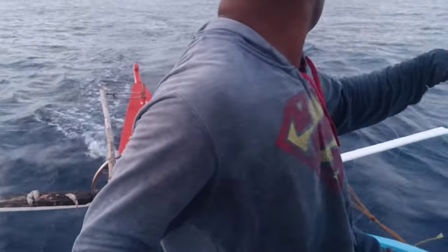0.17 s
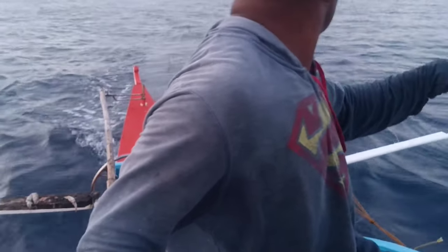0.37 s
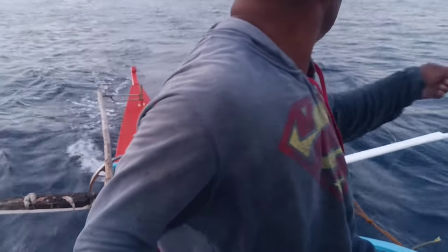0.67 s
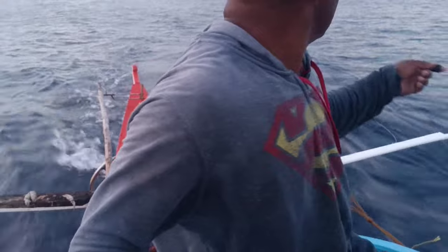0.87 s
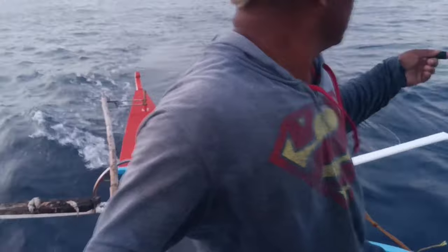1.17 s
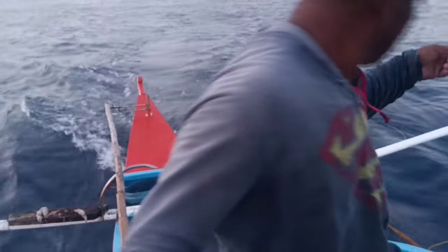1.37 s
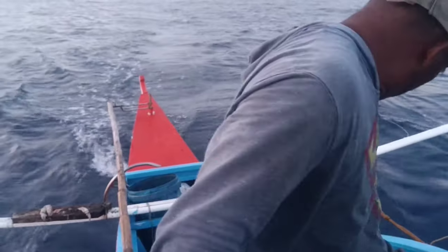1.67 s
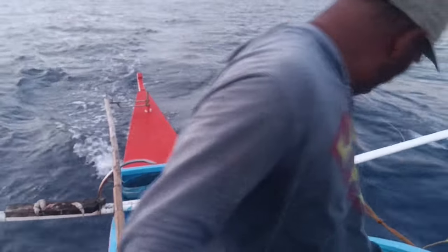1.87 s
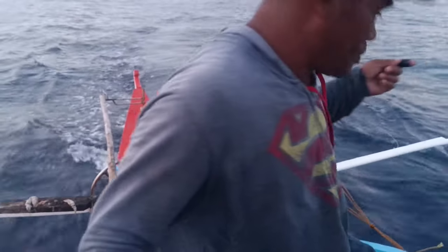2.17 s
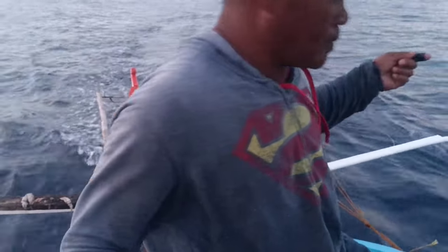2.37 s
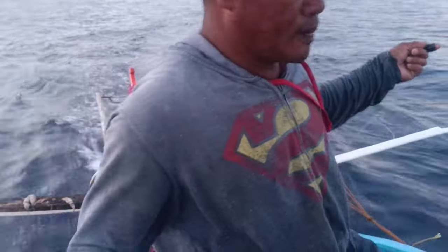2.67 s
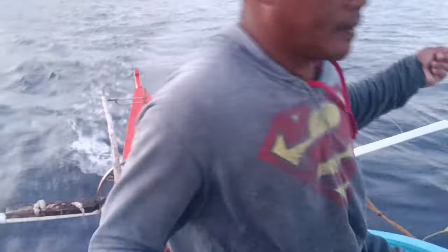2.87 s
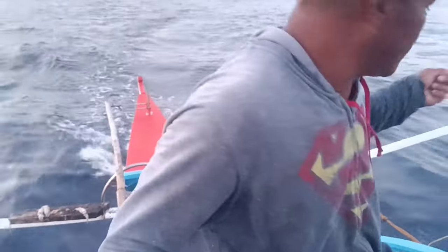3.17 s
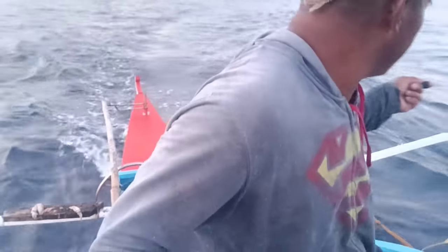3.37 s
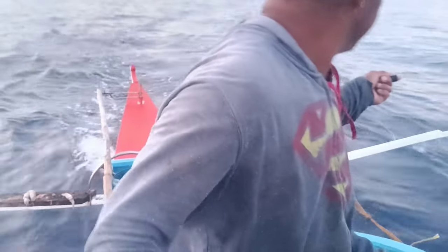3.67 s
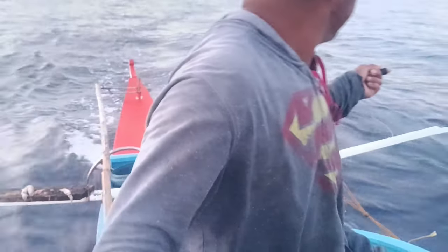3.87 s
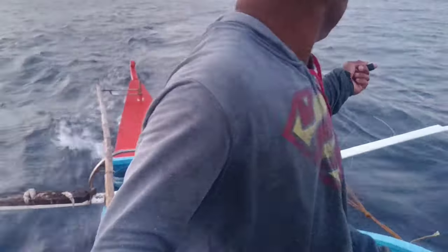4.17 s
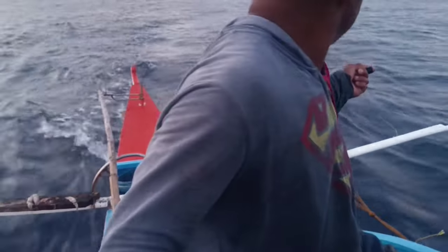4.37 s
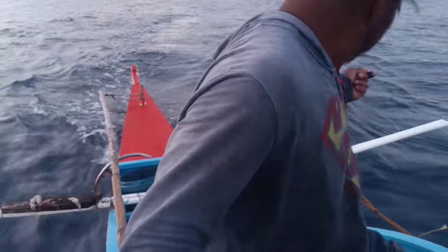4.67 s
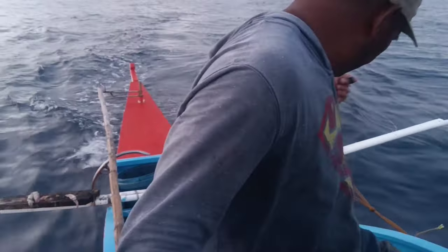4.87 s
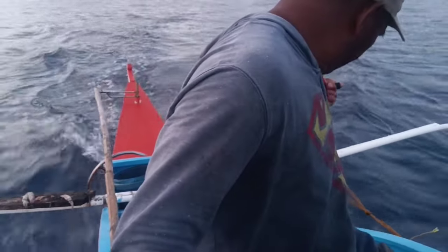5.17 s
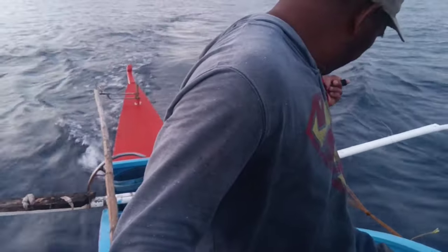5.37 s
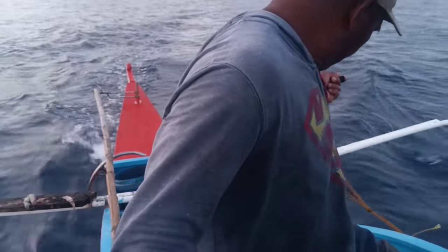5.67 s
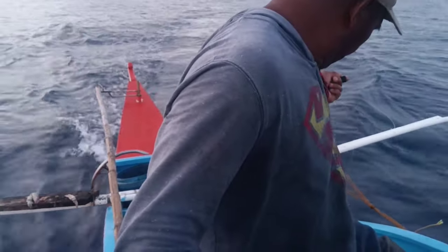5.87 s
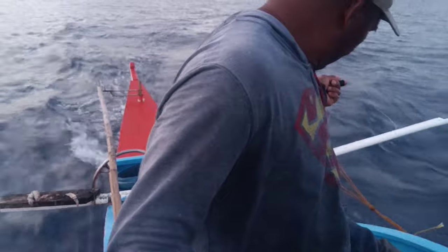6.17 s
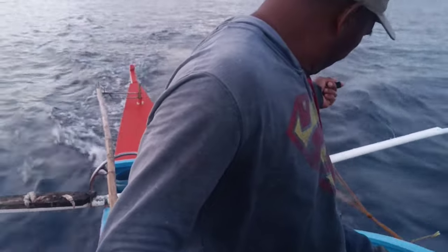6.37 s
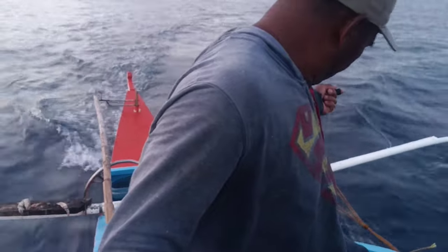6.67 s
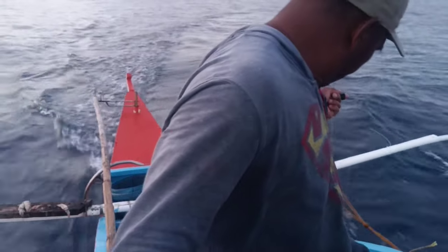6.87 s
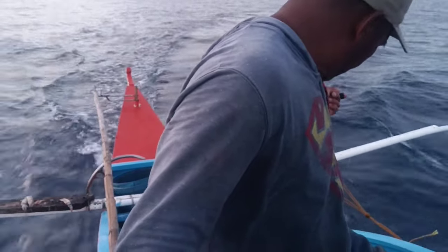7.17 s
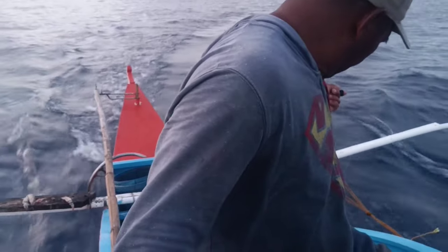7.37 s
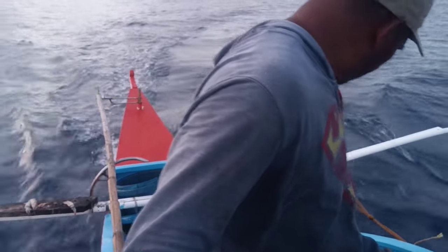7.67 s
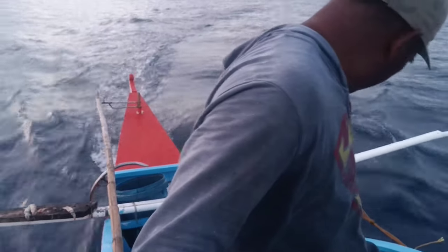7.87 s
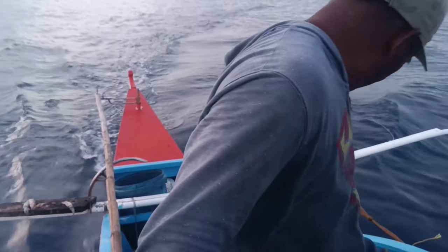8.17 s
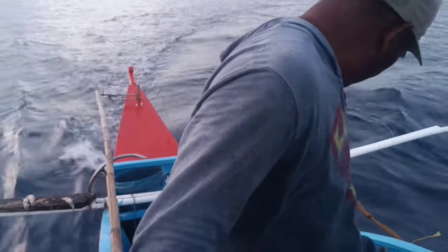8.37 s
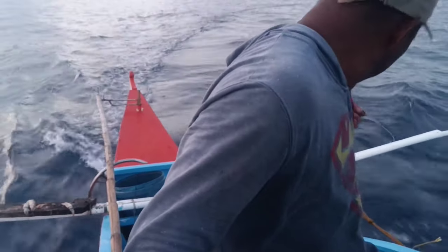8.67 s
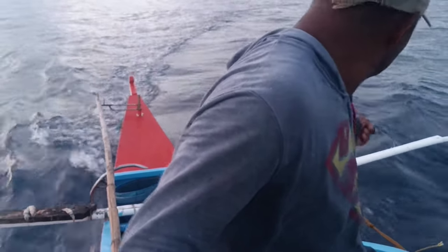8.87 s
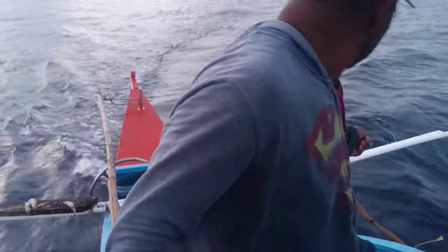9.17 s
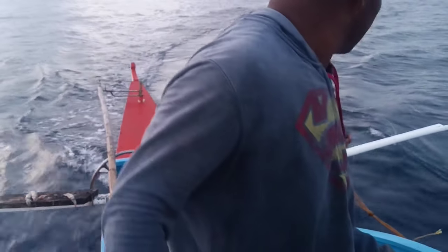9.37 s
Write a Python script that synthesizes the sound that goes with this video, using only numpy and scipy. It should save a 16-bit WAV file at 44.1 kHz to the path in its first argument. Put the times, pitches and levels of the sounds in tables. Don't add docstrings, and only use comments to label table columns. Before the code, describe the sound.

A small boat's one-cylinder engine thuds rapidly at cruising speed, then is throttled back to a slower, clattering idle amid hissing spray and light wind.

```python
import sys
import numpy as np
from scipy import signal
from scipy.fft import rfft, irfft, next_fast_len
from scipy.io import wavfile
from scipy.ndimage import uniform_filter1d, map_coordinates

SR = 44100
rng = np.random.default_rng(int(sys.argv[2]) if len(sys.argv) > 2 else 0)


def boost(x):
    u = np.asarray(x, float) / 20
    return 10 ** u


def dump(signal):
    limited = np.clip(np.atleast_2d(signal).T, -1, 1)
    pcm = np.round(limited * 32767).astype(np.int16)
    wavfile.write(sys.argv[1], SR, pcm)


N = 419832

# time in seconds, firings a second.
SPEED = [(0.0, 14.044), (1.5, 14.296), (2.1, 14.042), (3.0, 14.175), (3.6, 14.079), (4.36, 14.151),
         (4.5, 13.663), (4.65, 12.655), (5.1, 11.31), (5.8, 10.912), (6.1, 10.93), (6.4, 10.695),
         (7.3, 10.84), (7.6, 10.532), (7.9, 10.664), (8.5, 10.532), (8.8, 10.729), (9.52, 10.497)]
# time in seconds, load from 0 to 1.
THROTTLE = [
    (0, 1),
    (4.35, 0.95),
    (4.9, 0),
    (9.52, 0.14),
]
# mode in Hz, width in Hz, signed swing.
LOADED_PIPE = [(57.0, 8.0, -0.029), (109.5, 38.1, 0.499), (124.2, 15.8, -0.178), (136.2, 9.5, 0.181),
               (150.2, 15.3, -0.784), (183.3, 11.3, 0.2), (210.9, 8.0, -0.049), (251.0, 8.9, -0.117),
               (314.7, 15.1, -0.292), (327.7, 70.7, 0.656), (345.5, 16.2, -0.135), (367.9, 8.0, -0.061),
               (392.4, 24.2, -0.06), (439.2, 12.8, 0.022), (479.1, 12.8, -0.027)]
# mode in Hz, width in Hz, signed swing.
IDLE_PIPE = [(82.1, 16.1, -0.066), (95.4, 14.0, 0.203), (116.7, 17.8, 0.25), (131.0, 10.8, 0.267),
             (150.0, 33.1, -1.248), (175.4, 12.0, 0.393), (250.6, 8.0, 0.127), (265.6, 51.5, -0.361),
             (295.3, 38.1, 0.267), (320.5, 15.8, -0.164), (329.7, 11.7, 0.103), (379.3, 30.2, -0.085),
             (380.7, 11.2, 0.068), (469.3, 10.4, 0.02), (478.3, 14.6, -0.02)]
# mode in Hz, width in Hz, signed swing.
VALVE_CHEST = [
    (304, 56, 0.27),
    (383, 53, 0.24),
]
# mode in Hz, t60 in seconds, level under load in dB, level at idle in dB.
PLATES = [(863, 0.15, -2, -4.5), (1137, 0.17, -4.5, -4), (1274, 0.088, -3, -8), (1552, 0.086, 6, -17),
          (1692, 0.14, 3, -1.5), (1830, 0.13, -3, -5), (1876, 0.12, 6, -7), (1930, 0.031, -17, -14),
          (2293, 0.084, -2, 3), (2774, 0.026, 10, -9), (3313, 0.04, 4.5, -41), (3970, 0.06, -3, -30),
          (4480, 0.056, -1, -30)]
# frequency in Hz, level in dB per Hz.
RATTLE_COLOUR = [(260, -2.5), (450, -0.5), (530, -7), (858, -4), (1230, -8), (1820, -6.5), (2080, -10),
                 (4210, -27.5), (4500, -24), (5850, -36), (9900, -120)]
# frequency in Hz, level in dB per Hz.
KNOCK_COLOUR = [(1180, -48), (2000, 0), (3220, -5.5), (4240, -13.5), (4550, -6), (5900, -9.5), (7710, -10),
                (10500, -15.5), (12500, -15.5), (14900, -20), (15800, -37)]
# frequency in Hz, level in dB per Hz.
SPRAY_COLOUR = [(1470, -14), (2500, -1.5), (3350, -3.5), (4220, -16), (5660, -10), (6660, -15), (7830, -15),
                (9950, -20.5), (12200, -17), (14900, -25), (15800, -32)]
# frequency in Hz, level in dB per Hz.
RUMBLE_COLOUR = [(20, -46), (40, -12.5), (60, -3.5), (120, -11.5), (250, -2.5), (400, -11.5), (520, -21.5),
                 (700, -21), (1000, -50.5)]
# start in seconds, fizz in dB, body over the fizz in dB, length in seconds.
SPLASHES = [(1.461, -38.5, 2, 0.035), (1.49, -46, 2, .01), (1.504, -46.5, 0, 0.072), (2.5, -50, 10, 0.028),
            (2.902, -38.5, -1.5, .03), (4.612, -46, 3, 0.037), (4.642, -35, -4, .007),
            (4.684, -44, 2, 0.048), (5.704, -47, 10, 0.011), (5.762, -40, -8, .005),
            (5.865, -46, 2.5, 0.064), (6.015, -43, 2, 0.035), (6.573, -49.5, 5, 0.063),
            (6.599, -36, 8, 0.004), (6.903, -49, 7, .01), (6.948, -43, -3, 0.031), (6.983, -40, -2, .02),
            (7.558, -44, 3, .015), (8.013, -41.5, -1, 0.015), (8.263, -45, -2, 0.044)]
# start in seconds, level in dB, t60 in seconds.
DECK_KNOCKS = [
    (1.464, -18.5, 0.095),
    (2.908, -26.5, 0.18),
    (4.008, -24, 0.073),
]
# top in seconds, half length in seconds, gain of the deck hum in dB.
SWELLS = [
    (0.3, 0.17, 6.5),
    (1.3, 0.22, 6.5),
    (2.65, .25, 6),
    (5.103, 0.61, 7.5),
    (7.5, 0.25, 1.5),
    (8.495, 0.21, 6.5),
    (9.2, 0.21, 10),
]
# top in seconds, half length in seconds, level in dB.
GUSTS = [(1.585, .17, -29.5), (4.9, .25, -32), (5.91, 0.15, -29), (6.163, 0.034, -27), (6.58, 0.23, -34.5),
         (6.89, 0.18, -32), (7.2, 0.11, -32), (7.603, 0.14, -33.5), (7.92, 0.15, -31), (8.166, 0.22, -25.5),
         (8.598, 0.18, -30), (8.988, 0.22, -33), (9.482, .06, -33)]
# time in seconds, eddies a second.
EDDIES = [(1.3, 69), (1.5, 75.3), (1.8, 72), (5.2, 75.8), (5.65, 68.6), (5.8, 71), (6.7, 68.5), (7.0, 70.3),
          (7.15, 75.4), (7.78, 72.7), (7.94, 81.8), (8.02, 77), (8.18, 85), (8.36, 75.8), (8.58, 83.5),
          (8.68, 77), (9.1, 78), (9.45, 69)]
# frequency in Hz, side over middle in dB.
WIDTH = [(60, -2.5), (110, -1), (200, -6.5), (380, -9), (700, -5), (1290, -1.5), (2380, -1.5), (4400, 1),
         (8120, -0.5), (15000, 0)]
# frequency in Hz, left over right in dB.
PORTS = [(60, -0.5), (110, -0.5), (200, -1.0), (380, 2.5), (700, 0), (1290, 0.5), (2380, -0.5),
         (4400, -0.5), (8120, -4.5), (15000, 12.5)]

CRANK_START = -.691
LEAD = .25
TOP_HZ = 15850
CALM_DB = -60
# (dB under load, dB at idle)
THUD_DB, HUM_DB, RATTLE_DB = (-13.5, -14.5), (-41.5, -37.5), (-31.5, -28.5)
KNOCK_DB, SPRAY_DB = (-42.5, -45), (-47.5, -44.5)
OVERRUN, VALVE_S = 0.053, .0266
POP_S, IDLE_HZ = .036, 10.7
POP_IDLE, POP_OVERRUN = 0.11, 0.57
AHEAD, AHEAD_HZ = .5, 3000


def unit(x):
    return x / np.sqrt(np.mean(x ** 2) + 1e-20)


def along(points, hz):
    f, v = np.transpose(points)
    return np.interp(np.log(hz + 1), np.log(f + 1), v)


def coloured(points):
    return lambda hz: boost(along(points, hz))


def narrow(centre_hz, width_hz):
    return lambda hz: 1 / (1 + (2 * (hz - centre_hz) / width_hz) ** 2)


def curves(rows, t=None):
    s, *cols = np.transpose(rows)
    return [np.interp(np.arange(N) / SR if t is None else t, s, c) for c in cols]


def by_load(levels_db):
    load, = curves(THROTTLE)
    return load * levels_db[0] + (1 - load) * levels_db[1]


def bells(top_s, half_s):
    return np.exp(-((np.arange(N) / SR - top_s[:, None]) / half_s[:, None]) ** 2)


def wobble(rate):
    knots = rng.standard_normal(int(N * rate / SR) + 4)
    return map_coordinates(knots, [np.arange(N) * rate / SR])


def filtered(x, response):
    m = next_fast_len(N + 8192)
    return irfft(rfft(x, m) * response(np.fft.rfftfreq(m, 1 / SR)), m)[..., :N]


def rush(gain, patchy_db, tall=6, long=5):
    z = signal.stft(rng.standard_normal((2, N + 512)), nperseg=512)[2]
    field = uniform_filter1d(rng.standard_normal(z.shape[1:]), int(tall), 0)
    field = uniform_filter1d(field, int(long), 1)
    z = z * boost(patchy_db * unit(field))
    ahead = AHEAD / np.hypot(1, np.fft.rfftfreq(512, 1 / SR)[:, None] / AHEAD_HZ)
    z[1] = np.sqrt(1 - ahead ** 2) * z[1] - 1j * ahead * z[0]
    pair = signal.istft(z, nperseg=512)[1][:, :N]

    def spread(hz):
        side_gain = boost(along(WIDTH, hz)) / (1 + (70 / (hz + 1)) ** 2)
        return gain(hz) * np.array([np.ones_like(hz), side_gain])

    mid, side = filtered(pair, spread)
    return np.array([mid + side, mid - side]) / np.std(mid)


def laid(times, sounds):
    lead = round(LEAD * SR)
    out = np.zeros(lead + N + 2 * SR)
    for s, sound in zip(times, sounds):
        out[lead + round(s * SR):][:len(sound)] += sound
    return out[lead:lead + N]


def ring_time(delay=0):
    return np.maximum(np.arange(round(LEAD * SR)) / SR - delay, 0)


def wind():
    top_s, half_s, gust_db = np.transpose(GUSTS)
    strength = np.sqrt(boost(2 * gust_db) @ bells(top_s, half_s) ** 2 + boost(2 * CALM_DB))
    turns = np.cumsum(curves(EDDIES)[0]) / SR
    times = np.interp(np.arange(1, turns[-1]), turns, np.arange(N) / SR)
    chance = rng.standard_normal((len(times), 2))
    strength_db = 20 * np.log10(strength[(times * SR).astype(int)])
    times += chance[:, 0] * np.interp(strength_db, [-36, -29], [.001, .00015])
    u = (np.arange(SR // 100) / SR - .005) / 0.0011
    puffs = laid(times, boost(1.8 * chance[:, 1:]) * (1 - u * u) * np.exp(-u * u / 2))
    puffs = filtered(puffs, lambda hz: 1 / (1 + (85 / (hz + 1)) ** 2))
    return boost(8.5) * strength * unit(puffs) * np.array([[.05], [1]])


def spray():
    level_db = by_load(SPRAY_DB) + 3.0 + 1.2 * wobble(3.01) + 1.2 * wobble(13) + 1.8 * wobble(60)
    return boost(level_db) * rush(coloured(SPRAY_COLOUR), 3.1)


def splashes():
    t = ring_time()
    s, fizz_db, body_db, length = np.transpose(SPLASHES)[:, :, None]
    burst = boost(fizz_db) * np.exp(-(t / length) ** 4) * (1 - np.exp(-t / 0.0027))
    bright = lambda hz: 1 / (1 + (10500 / (hz + 1)) ** 8) / (1 + (hz / 15300) ** 40)
    full = lambda hz: (hz < 9500) / (1 + (2600 / (hz + 1)) ** 4)
    fizz = laid(s[:, 0], burst) * rush(bright, 2.5)
    body = laid(s[:, 0], burst * boost(body_db)) * rush(full, 1.2)
    drops = boost(3.5 * wobble(400))
    return drops * (fizz + body)


def deck_knocks():
    t = ring_time()
    s, db, t60 = np.transpose(DECK_KNOCKS)[:, :, None]
    knocks = laid(s[:, 0], boost(db - 60 * t / t60) * (1 - np.exp(-t / 0.0017)))
    return knocks * rush(narrow(2470, 1300), 1.9)


def firings():
    t = np.arange(-round(LEAD * SR), N) / SR
    turns = np.cumsum(curves(SPEED, t)[0]) / SR
    turns += CRANK_START - turns[round(LEAD * SR)]
    return np.interp(np.arange(np.ceil(turns[0]), turns[-1]), turns, t)


def beat(times, delay, rise, t60, scatter_db):
    t = ring_time(delay)
    shape = (1 - np.exp(-(t / rise) ** 2)) * boost(-60 * t / t60)
    return laid(times, boost(scatter_db * rng.standard_normal((len(times), 1))) * shape)


def hull(times):
    load, = curves(THROTTLE)
    push = unit(0.44 + 0.51 * beat(times, 0.024, 0.013, 0.19, 0.72))
    rumble_db = -29 - 1.5 * load + .8 * wobble(3)
    rumble = boost(rumble_db) * push * rush(coloured(RUMBLE_COLOUR), 2.3, 1.6, 7)
    top_s, half_s, swell_db = np.transpose(SWELLS)
    hum_db = by_load(HUM_DB) + swell_db @ bells(top_s, half_s) - 4.5
    return rumble + boost(hum_db) * push * rush(narrow(600.0, 69), 1.0)


def plates(times, delay, rise, scatter_db):
    hz, t60, loaded_db, idle_db = np.transpose(PLATES)
    load = curves(THROTTLE, times)[0][:, None]
    chance = rng.standard_normal((len(times), 3, len(PLATES)))
    blow_db = load * loaded_db + (1 - load) * idle_db + scatter_db * chance[:, 0]
    blows = boost(blow_db) * np.exp(2j * np.pi * chance[:, 1])
    t = np.maximum(np.arange(SR // 8) / SR - delay, 0)
    decay = boost(-60 * t / t60[:, None]) * (1 - np.exp(-t / rise))
    rings = decay * np.exp(2j * np.pi * hz[:, None] * t)
    lag = np.exp(1j * (rng.uniform(-0.49, 1.0, len(PLATES)) + 0.39 * chance[:, 2]))
    left = laid(times, ((blows * lag) @ rings).real)
    right = laid(times, ((blows / lag) @ rings).real)
    return unit(np.array([left, right]))


def rattle(times):
    load, = curves(THROTTLE)
    shake = .4 + (.1 + .65 * load) * beat(times[1:] - .004, .001, .005, .22, 1.2)
    shake += .12 * beat(times, .025, .006, .15, 3)
    shake += 0.23 * (1 - load) * beat(times[1:] - .016, 0.001, 0.0041, 0.23, 2.8)
    shake += 0.22 * (1 - load) * beat(times, 0.032, 0.0036, .15, 3.2)
    shake = unit(shake * boost(0.61 * wobble(90)))
    block = shake * rush(coloured(RATTLE_COLOUR), 2.6, 3, 4.9)
    cowl_gain = lambda hz: narrow(1800, 130)(hz) + 0.39 * narrow(2260, 70)(hz)
    cowl = boost(-10.5 - 3.7 * load) * shake * rush(cowl_gain, 0.72)
    clang = boost(-6.5) * plates(times[1:] - .003, 0.001018, 0.009, 3.0)
    later = times + .3 / curves(SPEED, times)[0]
    clang += boost(-12.0) * plates(later, 0.001003, 0.0023, 2.5)
    return boost(by_load(RATTLE_DB)) * (block + cowl + clang)


def knock(times):
    load, = curves(THROTTLE)
    blow = beat(times[1:] - .002, .001, .004, .15, .8) * boost(2.2 * wobble(150))
    level_db = by_load(KNOCK_DB) + 0.58 * wobble(2.4) - 3.0 + 5.3 * load
    return boost(level_db) * unit(blow) * rush(coloured(KNOCK_COLOUR), 3.9, 4.5, 4.5)


def pipe(modes, count, delay, scatter_db):
    hz, width, swing = np.transpose(modes)[:, :, None]
    t = ring_time(delay)
    rings = swing * np.exp(-np.pi * width * t) * np.sin(2 * np.pi * hz * t)
    return boost(scatter_db * rng.standard_normal((count, len(modes)))) @ rings


def exhaust(times):
    count = len(times)
    load = curves(THROTTLE, times)[0][:, None]
    speed = curves(SPEED, times)[0]
    loaded = pipe(LOADED_PIPE, count, .0004, .35) - .18 * pipe(LOADED_PIPE, count, .0288, 1.5)
    idle = pipe(IDLE_PIPE, count, .0004, .45) + .45 * pipe(IDLE_PIPE, count, .0266, 1.2)
    slowing = np.clip(-np.gradient(speed, times) - 1, 0, 4)[:, None]
    overrun = OVERRUN * slowing * pipe(IDLE_PIPE, count, VALVE_S, 3.5)
    pop = (1 - load) * (POP_IDLE + POP_OVERRUN * np.abs(speed - IDLE_HZ)[:, None])
    overrun += pop * pipe(VALVE_CHEST, count, POP_S, 3.3)
    thuds = laid(times, load * loaded + (1 - load) * idle + overrun)
    thuds = filtered(thuds, lambda hz: 1 / np.sqrt(1 + (hz / 650) ** 8))
    power = uniform_filter1d(uniform_filter1d(thuds ** 2, SR // 3), SR // 3)
    thuds = thuds / np.sqrt(np.abs(power) + 1e-9)
    level_db = by_load(THUD_DB) + 0.1 * wobble(2.97) + 0.17
    return boost(level_db) * boost([[-.25], [.25]]) * [np.roll(thuds, 3), thuds]


def engine():
    times = firings()
    return hull(times) + rattle(times) + knock(times) + exhaust(times)


def scene():
    return wind() + spray() + splashes() + deck_knocks() + engine()


def low_pass(x):
    return signal.sosfilt(signal.butter(12, 15970, fs=SR, output="sos"), x)


def record(dry):
    def ports(hz):
        balance = boost(np.array([[.5], [-.5]]) * along(PORTS, hz) * (hz > 400))
        return balance / np.sqrt(1 + (30 / (hz + 1)) ** 4)

    x = filtered(dry, ports)
    x = x / (1 + np.abs(x / 0.93) ** 6) ** (1 / 6)
    return low_pass(filtered(x, lambda hz: hz < TOP_HZ))


dry = scene()
out = record(dry)
dump(out)
```